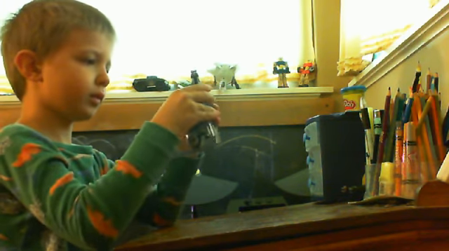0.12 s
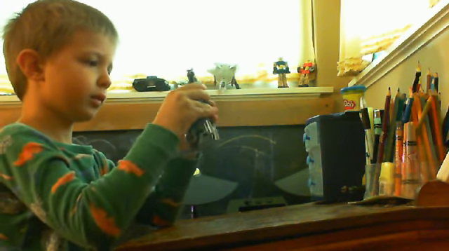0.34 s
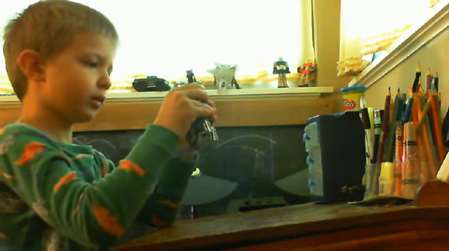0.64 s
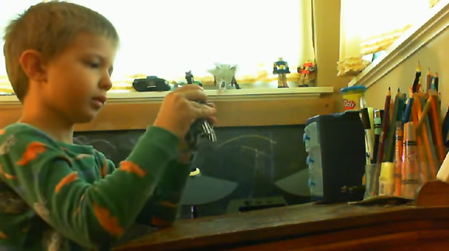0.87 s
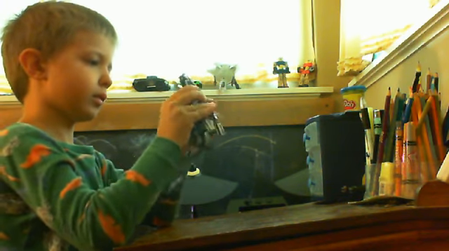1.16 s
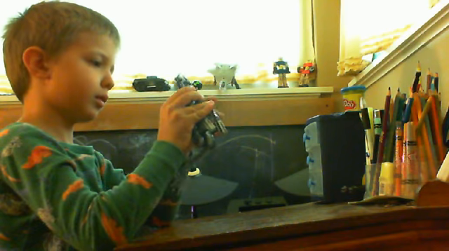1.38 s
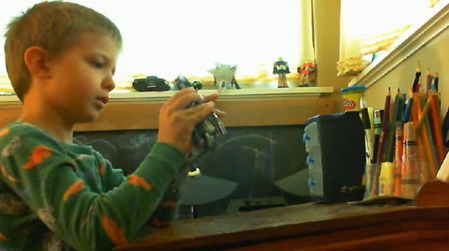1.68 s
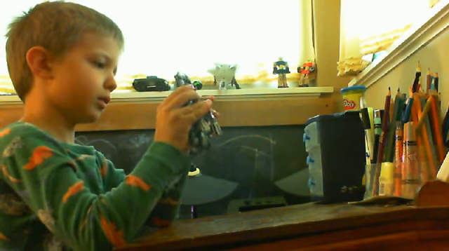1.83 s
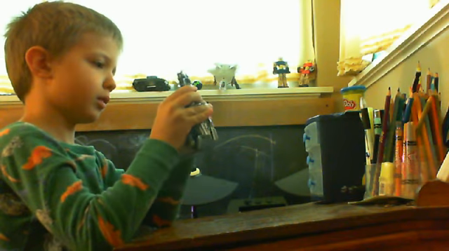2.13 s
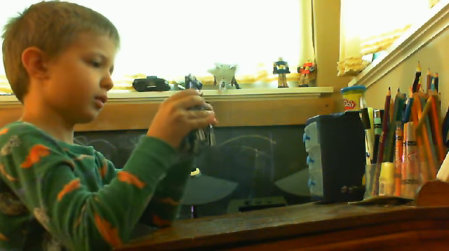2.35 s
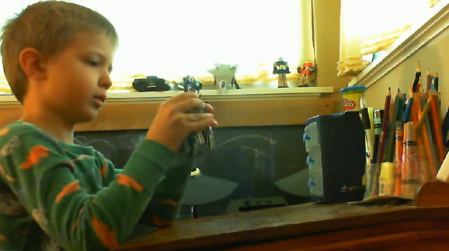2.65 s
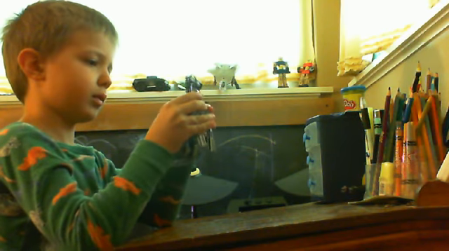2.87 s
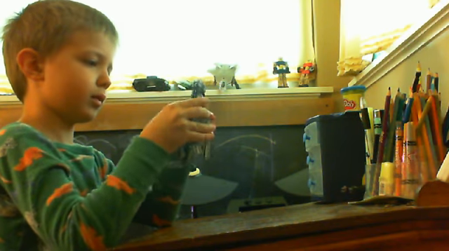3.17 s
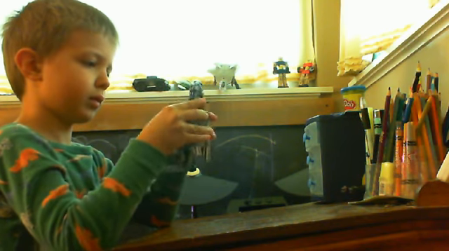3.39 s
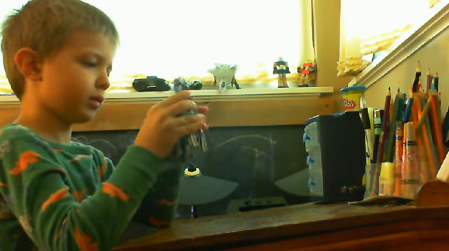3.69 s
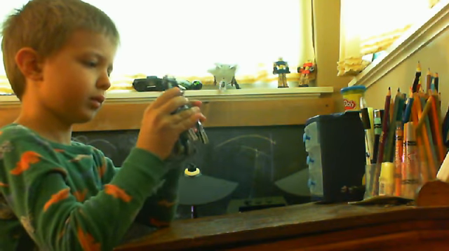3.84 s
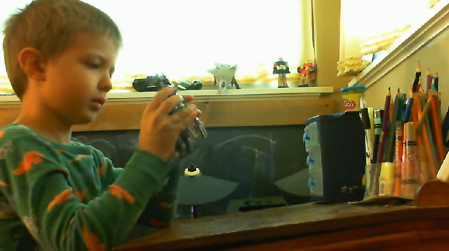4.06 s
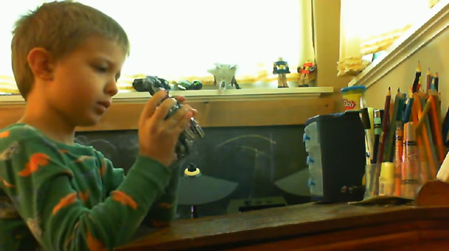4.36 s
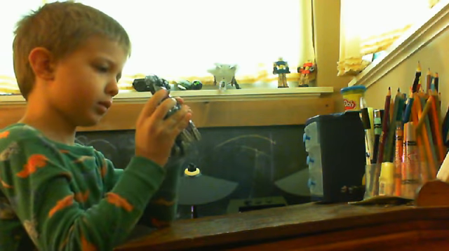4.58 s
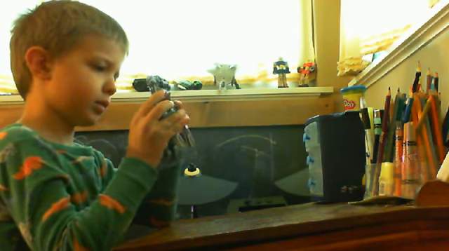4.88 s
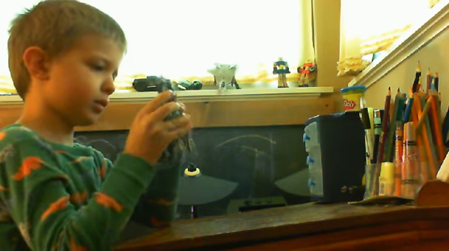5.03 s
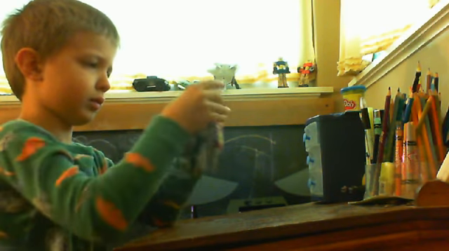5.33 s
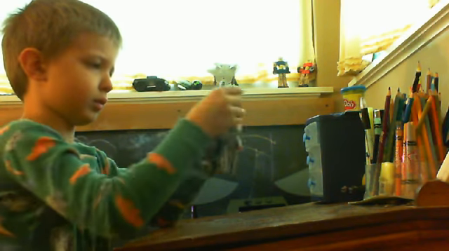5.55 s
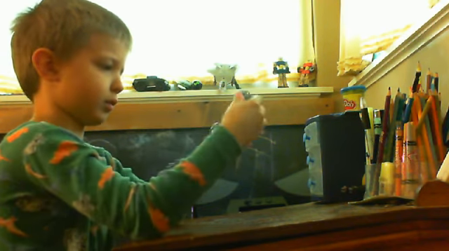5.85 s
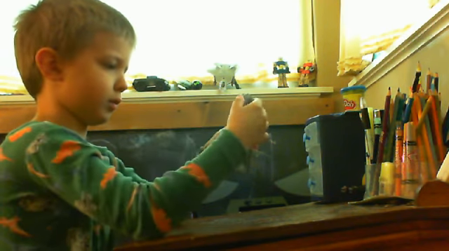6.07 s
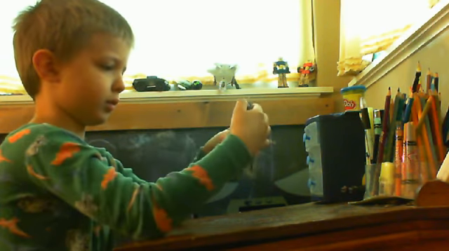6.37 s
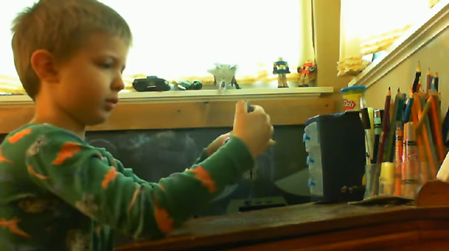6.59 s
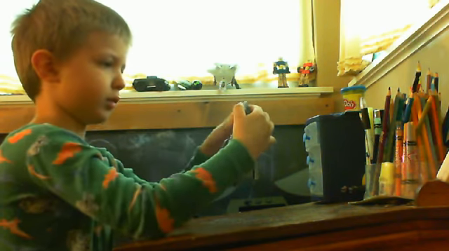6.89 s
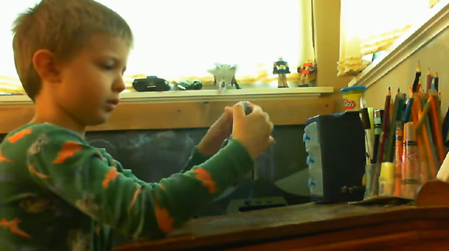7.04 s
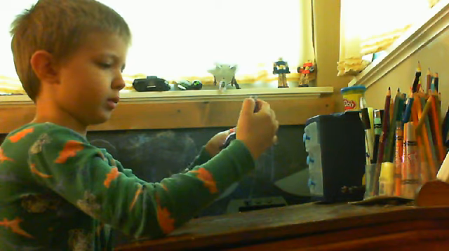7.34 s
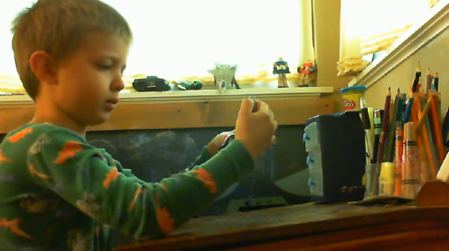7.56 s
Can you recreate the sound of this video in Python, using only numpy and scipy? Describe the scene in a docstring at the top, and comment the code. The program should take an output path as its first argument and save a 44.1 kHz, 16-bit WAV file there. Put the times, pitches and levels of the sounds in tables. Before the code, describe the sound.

A small jointed plastic toy is folded by hand at a desk. Bright dry clicks come irregularly, some with a tiny scrape and rattle. One very loud crack hits at about 2.6 seconds, another strong one at 4.1, then a busier cluster with thin squeaks after 5 seconds. Close camera microphone, small room, steady soft hiss and low hum.

```python
"""Sharp plastic snaps and rattles: a small toy figure is folded and flipped by hand at a desk.
Each joint scrapes, snaps and knocks its loose parts; that force rings a resonant plastic body in a room.
Some joints squeak in bands of fluttering noise, faint ticks fall between, and a pure tone glides softly.
Underneath, the desk trembles as a low narrow resonance, in steady room air and camera microphone hiss."""
import sys
import numpy as np
from scipy import signal
from scipy.fft import rfft, irfft, next_fast_len
from scipy.io import wavfile
from scipy.ndimage import uniform_filter1d, map_coordinates

SR = 44100
rng = np.random.default_rng(int(sys.argv[2]) if len(sys.argv) > 2 else 0)


def generate_wav(signal):
    """Clip the signal to [-1, 1] and save it as 16-bit WAV at the path in sys.argv[1]."""
    frames = np.transpose(np.atleast_2d(signal))
    scaled = np.clip(frames, -1, 1) * 32767
    pcm = np.round(scaled).astype(np.int16)
    wavfile.write(sys.argv[1], SR, pcm)


N = 340452  # samples

# What the whole figure rings with, from hollow shell to small peg.
# Each row: centre in Hz, width in Hz, full ring boost in dB.
FIGURE = [(3010, 770, 10.5), (4830, 950, 6), (7820, 1230, 7.5), (12400, 600, 3)]


def amp(db):
    """Decibels to gain."""
    return 10 ** (np.asarray(db) / 20)


def unit(x):
    """Scale to rms 1."""
    return x / np.sqrt(np.mean(x ** 2) + 1e-20)


def along(points, hz):
    """Read (Hz, value) points on a log frequency axis."""
    f, v = np.transpose(points)
    return np.interp(np.log(hz + 1), np.log(f + 1), v)


def bump(hz, centre_hz, width_hz):
    """A resonance curve of height 1, with its full width at half height."""
    return 1 / (1 + (2 * (hz - centre_hz) / width_hz) ** 2)


def filtered(x, response):
    """Shape the spectrum of x by a gain that is a function of frequency."""
    m = next_fast_len(len(x) + SR // 2)
    hz = np.fft.rfftfreq(m, 1 / SR)
    return irfft(rfft(x, m) * response(hz), m)[:len(x)]


def noise(response, size=N):
    """Coloured noise of rms 1."""
    return unit(filtered(rng.standard_normal(size), response))


def causal(gain_db):
    """Minimum phase: the sharpest impulse response that has this spectrum."""
    cepstrum = irfft(np.log(amp(gain_db)))
    half = len(cepstrum) // 2
    # folding the cepstrum forward in time puts the energy as early as possible
    cepstrum[1:half] *= 2
    cepstrum[half + 1:] = 0
    return irfft(np.exp(rfft(cepstrum)))


def evened(x, size=40):
    """Unit energy, spread in time much as x is, but with an even spectrum."""
    spectrum = rfft(x)
    power = uniform_filter1d(abs(spectrum) ** 2, size=size)
    power = uniform_filter1d(power, size=size)
    y = irfft(spectrum / np.sqrt(abs(power) + 1e-12), len(x))
    return y / np.linalg.norm(y)


def add(track, s, sound):
    """Mix a sound into the track at time s."""
    i = max(0, round(s * SR))
    track[i:i + len(sound)] += sound[:max(0, len(track) - i)]


def joints():
    """Every snap rings the figure and the joint's own note; the hardest snaps are mostly crack."""
    # Joint snaps. Each row: time in seconds, level in dB, brightness in dB per octave,
    # the joint's own note in Hz, boost of that note in dB, slide before the snap in seconds.
    clicks = [(0.1068, -17, -1, 5100, 9, 0.0011), (0.3435, -6.5, -0.3, 2820, 7, 0),
              (0.5665, -15.5, 3, 2950, 4, 0), (0.7427, -19.5, -2, 3400, 9, .004),
              (0.9925, -12, 2, 7900, 12, 0), (1.4746, -10.5, 1, 7850, 5, .002),
              (1.4783, -11, -1, 2800, 2.5, 0), (1.707, -15, 3, 8060, 10, .008),
              (1.8932, -14, -2.5, 2500, 7, .001), (2.059, -18.5, -3, 3200, 5, 0),
              (2.101, -4.5, 0.1, 5600, 5, .0016), (2.3741, -19, -4, 2680, 4, .0035),
              (2.5558, 15, -0.1, 2700, 2.5, 0.00031), (2.799, -15, 0, 7700, 7, .001),
              (2.9768, -9.5, -2.7, 7400, 5, .006), (3.5443, -21.5, -4, 6500, 3, 0.0037),
              (4.1015, 4.5, 2, 9700, 3.5, 0.00029), (4.646, -17, 3, 8030, 11, 0),
              (4.6776, -15.5, -2, 3300, 4, .017), (4.9119, -25, -2.5, 3000, 12, .003),
              (5.0161, -18, 0, 7550, -1, 0), (5.1361, -4.5, -1.7, 7550, 5, .0024),
              (5.2671, -16, 1, 3050, 8, 0.0013), (5.353, -5.5, 0, 7400, 10.5, 0.0047),
              (5.6606, -1.9, 0.5, 3200, 6.5, .0014), (5.865, -20, -4.5, 3000, 5, 0.0016),
              (6.164, -0.5, 1, 5000, 12, 0.0077)]
    hard_db = 3  # around this level the bare crack starts to swamp the figure's ring
    note_width_hz = 650
    overtone_ratio, overtone_share = 2.19, 0.52  # second mode: pitch ratio, share of the note's dB
    out = np.zeros(N)
    for s, db, tilt_db, note_hz, note_db, slide_s in clicks:
        ringing = 1 / (1 + amp(db - hard_db))
        rings = [(hz, width_hz, ringing * ring_db) for hz, width_hz, ring_db in FIGURE]
        rings.append((note_hz, note_width_hz, note_db))
        rings.append((overtone_ratio * note_hz, note_width_hz, overtone_share * note_db))
        lead_s, click = contact(tilt_db, rings, slide_s)
        add(out, s - lead_s, amp(db) * click)
    return out


def contact(tilt_db, rings, slide_s):
    """The force of a snap rings the plastic and sounds in the room; returns lead in s and sound."""
    force = snap(slide_s)
    struck = signal.fftconvolve(force, plastic(tilt_db, rings))
    return len(force) / 2 / SR, signal.fftconvolve(struck, room())


def snap(slide_s, rattle=0.12, slide_db=-6, chatter_db=2, chatter_s=0.0085, rattle_s=0.02, count=4):
    """Force on a joint, centred on the snap: a rising scrape, the release, then loose parts knocking.

    Rattle, slide_db and chatter_db are relative to the release; chatter_s is a 60 dB decay."""
    t = np.arange(-SR // 20, SR // 20) / SR
    grit = rng.standard_normal(len(t))
    scrape = grit * (t < 0) * np.exp(-abs(t) / max(slide_s / 2, 1e-5))
    chatter = grit * (t > 0) * amp(-60 * abs(t) / chatter_s)
    force = amp(chatter_db) * chatter / np.linalg.norm(chatter)
    force += (slide_s > 0) * amp(slide_db) * scrape / (np.linalg.norm(scrape) + 1e-12)
    force[len(t) // 2] += 1  # the release
    # knocks at uneven intervals, each weaker than the one before
    turn = (np.arange(count) + rng.uniform(.5, 1, count)) / count
    knocks = np.searchsorted(t, np.minimum(turn * rattle_s, t[-1]))
    force[knocks] += rattle * (1 - turn / 2)
    return evened(force, size=30) * (t >= -2 * abs(slide_s))


def plastic(tilt_db, rings, ripple_db=1.5, size=2048):
    """Body response of one contact: a hard crack boosted at resonances (Hz, width Hz, dB)."""
    # The crack of hard plastic. Each row: frequency in Hz, relative level in dB.
    crack = [(100, -14), (300, -25), (800, -18), (1500, -14), (2500, -8.5), (4500, -4.5), (7000, 1),
             (12000, 0), (14000, -4.5), (16000, -24)]
    hz = np.fft.rfftfreq(size, 1 / SR)
    tilt = tilt_db * np.log2(np.maximum(hz, 1000) / 7000)
    colour = along(crack, hz) + tilt
    colour += sum(db * bump(hz, centre, width) for centre, width, db in rings)
    # each new grip moves the many lesser modes of the figure
    lesser = uniform_filter1d(rng.standard_normal(len(hz)), size=8)
    lesser = unit(uniform_filter1d(lesser, size=5))
    return causal(colour + ripple_db * lesser)


def room(tail_db=0.0, build_s=0.0031, smear_s=0.0013):
    """Path from the moving toy to the microphone: direct sound, near reflections, diffuse tail."""
    # Reflections from desk and near walls. Each row: mean delay in seconds, gain relative to direct.
    walls = [(.0017, 0.68), (.0024, 0.42), (.0068, .3), (.0085, .38), (0.012, .22)]
    # How long the diffuse tail rings. Each row: frequency in Hz, 60 dB decay time in seconds.
    decay = [(300, 0.24), (2500, 0.17), (8000, 0.24), (15000, 0.21)]
    size = SR // 3
    t = np.arange(size) / SR
    hz, frame_s, cells = signal.stft(rng.standard_normal(size), SR, nperseg=256)
    fade = amp(-60 * frame_s / along(decay, hz)[:, None])
    tail = signal.istft(cells * fade, SR, nperseg=256)[1][:size]
    tail *= 1 - np.exp(-t / build_s)
    path = amp(tail_db) * tail / np.linalg.norm(tail)
    path[0] += 1  # direct sound
    for delay_s, gain in walls:
        # clutter spreads each reflection, and the moving toy shifts its delay
        scatter = rng.standard_normal(size) * np.exp(-t / smear_s)
        add(path, delay_s * rng.uniform(.9, 1.1), gain * scatter / np.linalg.norm(scatter))
    return evened(path, size=150)[:SR // 4]


def ticks(count=7, mean_db=-22.5, spread_db=1.5, tilt_db=-1.5):
    """Loose parts tick faintly as the fingers shift their grip, once at random in each equal slot."""
    out = np.zeros(N)
    for k in range(count):
        s = (k + rng.uniform()) / count * N / SR
        db = rng.normal(mean_db, spread_db)
        lead_s, click = contact(tilt_db, FIGURE, 0)
        add(out, s - lead_s, amp(db) * click)
    return out


def squeaks(spacing_hz=930, width_hz=260, flutter_db=2.0, waver=0.0113, trim_db=-1):
    """Plastic rubbing on plastic sings in a few fuzzy partials, catching and slipping unevenly."""
    # Tight joints turning. Each row: start in seconds, end in seconds, pitch in Hz,
    # level in dB before the trim, level of the nearest neighbouring partials in dB.
    turns = [(4.17, 4.34, 5600, -62, -20), (5.27, 5.44, 7250, -51, -2), (5.42, 5.637, 7100, -49, -3),
             (5.97, 6.077, 8050, -50.5, -5), (6.67, 6.82, 6800, -56.5, -12), (7.54, 7.63, 6800, -53, -4),
             (7.642, 7.712, 6700, -53, -12)]
    out = np.zeros(N)
    t = np.arange(SR // 2) / SR
    for start, end, pitch_hz, db, side_db in turns:
        def partials(hz):
            """One partial below the pitch and three above it, weaker with distance."""
            return sum(amp(side_db * np.sqrt(abs(k))) * bump(hz, pitch_hz + k * spacing_hz, width_hz)
                       for k in range(-1, 4))
        progress = np.clip(t / max(end - start, .01), 0, 1)
        stroke = np.sqrt(abs(np.sin(np.pi * progress)))
        grip = noise(lambda hz: bump(hz, 15.4, 40), size=len(t))
        # a firmer grip makes the rub louder and a little higher
        steady = noise(partials, size=len(t))
        rub = map_coordinates(steady, [np.cumsum(1 + waver * grip)], mode="wrap")
        add(out, start, amp(db + trim_db) * stroke * unit(amp(flutter_db * grip) * rub))
    return out


def glide():
    """A faint pure tone that barely rises out of the room air, swelling and fading as it glides."""
    # The tone falls, then rises. Each row: start in seconds, length in seconds,
    # first pitch in Hz, last pitch in Hz, rms level in dB at the height of the swell.
    tones = [(2.46, 0.21, 485, 450, -56), (2.79, 0.225, 423, 564, -56)]
    out = np.zeros(N)
    for s, length_s, first_hz, last_hz, db in tones:
        u = np.linspace(0, 1, round(length_s * SR))
        pitch_hz = first_hz + (last_hz - first_hz) * u
        phase = 2 * np.pi * np.cumsum(pitch_hz) / SR
        swell = np.sqrt(2 * abs(np.sin(np.pi * u)))
        add(out, s, amp(db) * swell * np.sin(phase))
    return out


def desk(sway_hz=28.1, width_hz=3, rest_db=-47.5, rise_s=0.037, decay_s=0.062):
    """The desk trembles at its one low resonance; each nudge swells it, holds and dies away."""
    # The arms lean on the desk. Each row: start of hold in seconds, hold in seconds, peak level in dB.
    nudges = [(0, 0.16, -37), (1.405, .06, -37.5), (1.722, 0.11, -38), (3.88, 0.11, -37), (4.04, .1, -34.5),
              (6.73, 0.14, -38), (7.52, .05, -38)]
    t = np.arange(N) / SR
    power = amp(rest_db) ** 2  # trembling between nudges
    for s, length_s, db in nudges:
        before = np.maximum(s - t, 0) / rise_s
        after = np.maximum(t - s - length_s, 0) / decay_s
        power = power + (amp(db) * np.exp(-before - after)) ** 2
    wander = noise(lambda hz: bump(hz, sway_hz, width_hz))
    # keep only the wandering phase, so the nudges alone set the level
    sway = np.cos(np.angle(signal.hilbert(wander)))
    return np.sqrt(power) * sway


def floor(level_db=-44.5):
    """Steady room air and microphone hiss: noise coloured by a fixed spectrum."""
    # Colour of air and hiss. Each row: frequency in Hz, relative density in dB per Hz.
    air = [(24, -35), (40, 4), (49, -4.5), (83, 0.5), (117, -6.5), (230, -8), (281, -9.5), (409, -11),
           (708, -14), (844, -15), (1110, -17), (2870, -22), (3420, -23), (8840, -25), (15700, -22)]
    return amp(level_db) * noise(lambda hz: amp(along(air, hz)))


def scene():
    """The toy over the quiet room, as one channel."""
    toy = joints() + ticks() + squeaks()
    background = glide() + desk() + floor()
    return (toy + background)[None]


def record(dry, top_hz=15850, offset=-.1153):
    """The camera keeps nothing above its band limit, and its converter rests off zero."""
    limited = [filtered(x, lambda hz: hz < top_hz) for x in dry]
    return np.array(limited) + offset


dry = scene()
out = record(dry)
generate_wav(out)
```